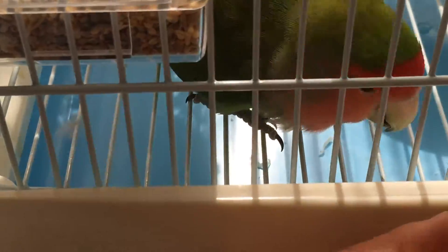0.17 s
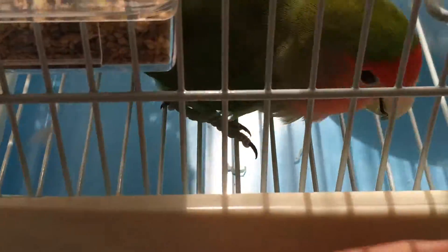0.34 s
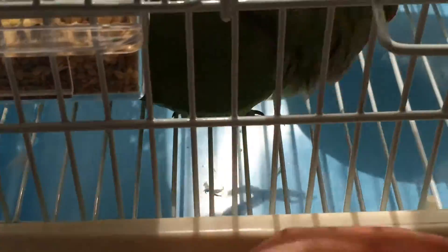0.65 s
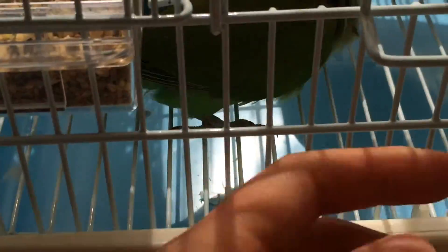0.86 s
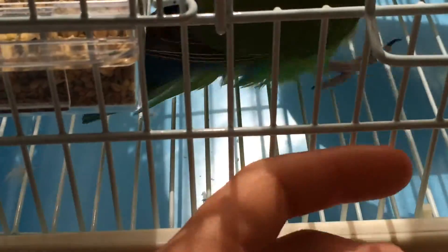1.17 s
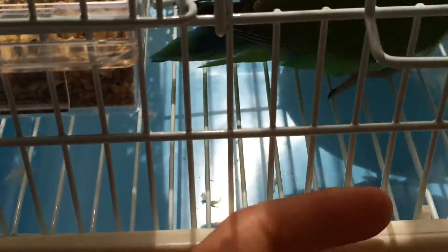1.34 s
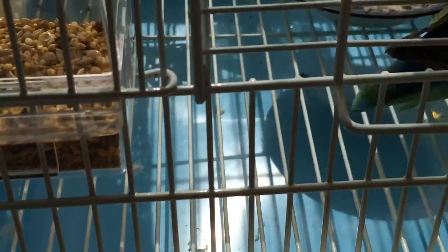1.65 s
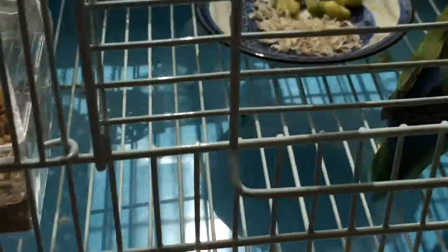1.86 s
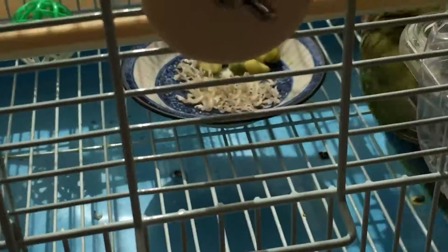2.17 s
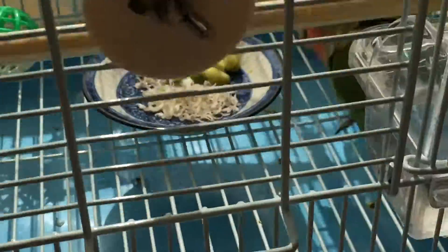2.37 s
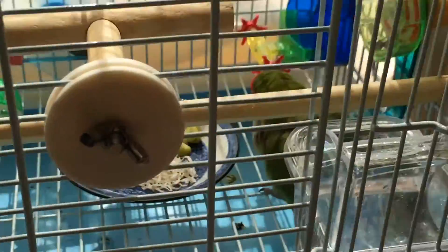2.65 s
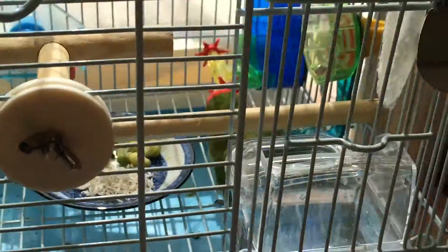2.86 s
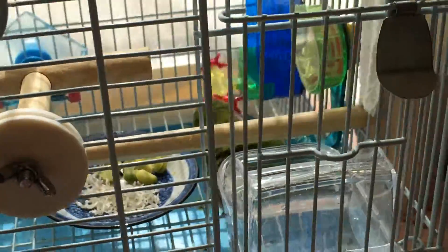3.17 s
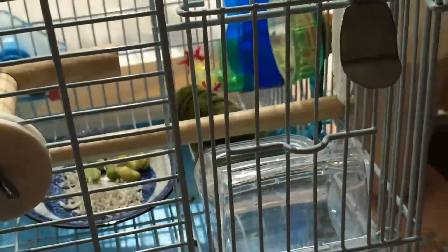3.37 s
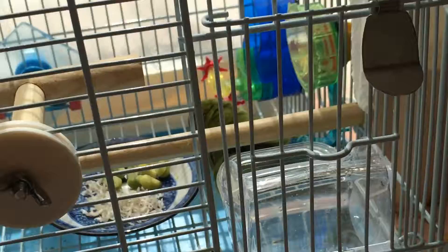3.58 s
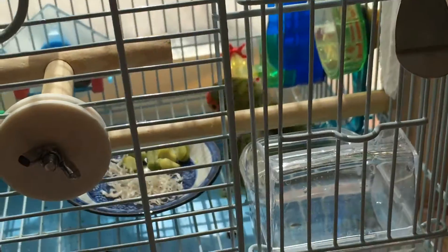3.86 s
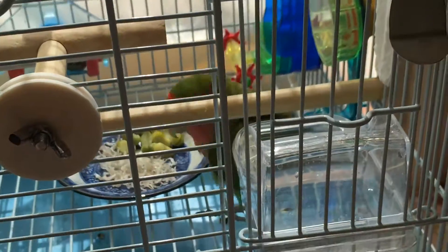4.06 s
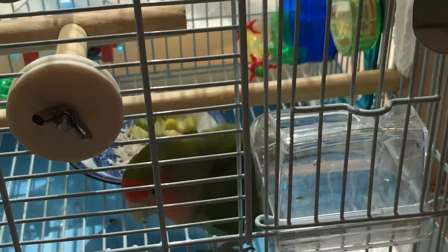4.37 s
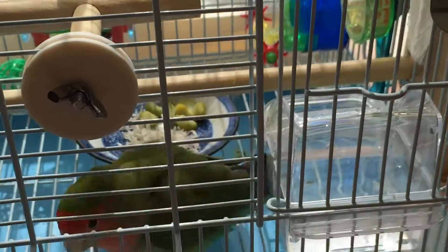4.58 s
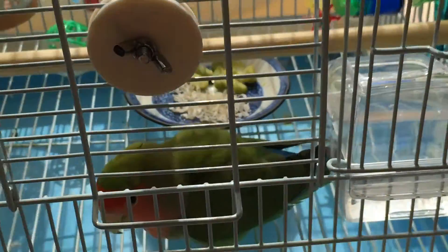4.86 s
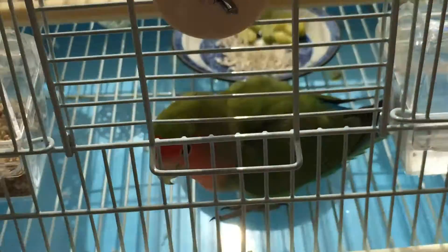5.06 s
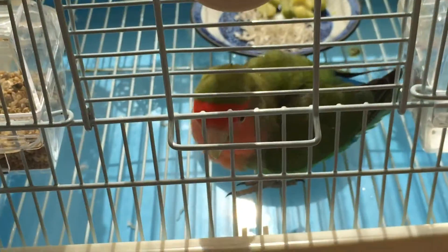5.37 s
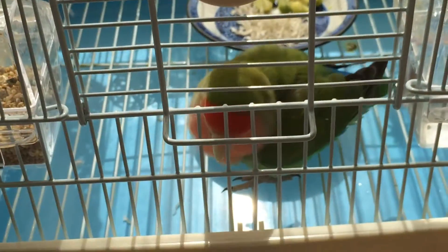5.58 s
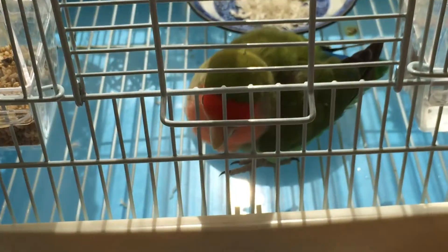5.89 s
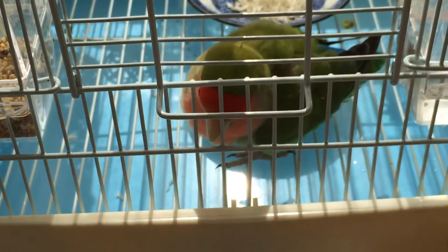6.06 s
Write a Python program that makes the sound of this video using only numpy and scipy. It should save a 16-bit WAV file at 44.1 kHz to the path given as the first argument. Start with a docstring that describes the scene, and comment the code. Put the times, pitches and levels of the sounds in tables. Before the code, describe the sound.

Claws tick on wire, cage bars clatter loudly, and a small bird gives one high chirp before knocking a loose toy about.

```python
"""A quiet room, close to a cage: a small parrot walks the wire floor, claws scuffing and ticking.
It jolts the cage once: loose bars chatter through the cage resonances and the frame rocks.
It chirps once, four partials on an arched pitch, then rattles and bangs a loose hard toy,
which rings in short modes. Under it all: faint rustle, hush, a low hum, a little echo."""
import sys
import numpy as np
from scipy import signal
from scipy.fft import rfft, irfft
from scipy.io import wavfile
from scipy.ndimage import uniform_filter1d

SR = 44100
rng = np.random.default_rng(int(sys.argv[2]) if len(sys.argv) > 2 else 0)


def master_out(mix):
    """Clip the mix to full scale and print it as 16-bit PCM to the path in sys.argv[1]."""
    frames = np.transpose(np.atleast_2d(mix))
    ceiling = np.clip(frames, -1, 1)
    pcm = np.round(ceiling * 32767).astype(np.int16)
    wavfile.write(sys.argv[1], SR, pcm)


N = 274743

# Room and microphone noise. Each row: frequency in Hz, density in dB.
HUSH_SPECTRUM = [(12, -53.5), (20, -19), (101, -2), (208, -10), (275, -8), (308, -18), (396, -14.5),
                 (430, -15.5), (495, -15.5), (636, -20.5), (692, -18), (1470, -23.5), (1600, -24.5),
                 (1890, -27.5), (15700, -53)]
# Low hum. Each row: time in seconds, level in dB.
HUM_LEVELS = [(0, -70), (1, -51.5), (1.6, -72), (2.2, -56), (3.8, -55.5), (4.3, -70.5), (6.23, -69)]
# Room decay. Each row: frequency in Hz, t60 in seconds.
ROOM_T60 = [(250, 1), (1000, 1), (4000, 0.26), (7500, 0.26), (11000, 0.25), (15000, 0.15)]
# The bird stirring, and the cage's noise at the jolt. Each row: time in seconds, level in dB.
RUSTLE_LEVELS = [(0.0, -54.5), (0.31, -90.5), (0.64, -70.5), (1.21, -52.5), (1.361, -38), (1.54, -71),
                 (1.719, -75), (2.15, -65), (3.539, -56), (3.66, -67.5), (3.97, -59), (4.27, -62.5),
                 (4.94, -68.5), (6.23, -83.5)]
# Rustle colour. Each row: frequency in Hz, density in dB.
RUSTLE_SPECTRUM = [(500, 1), (1300, -1), (2500, -9.5), (5000, -12.5), (10000, -19.5), (15800, -24)]
# Ticks of claw or husk. Each row: start in seconds, level in dB, tilt in dB per octave.
DRY_TICKS = [(0.879, -63, -10), (1.5898, -45, 3), (2.2548, -52, 5.5), (2.5077, -47, 3.5),
             (2.5825, -43.5, 9), (2.817, -50, -2), (2.997, -41.5, -8), (4.0974, -59, -8), (4.9534, -53, -7),
             (5.0264, -37, -6), (5.228, -57, 2), (5.935, -49.5, -1.5)]
# Tick colour. Each row: frequency in Hz, density in dB.
TICK_SPECTRUM = [(300, -22), (900, -7), (2000, -4.5), (6000, 3.5), (15000, -11)]
# Claws, and loose wires rebounding from the jolt, strike the wire floor.
# Each row: start in seconds, level in dB, tilt in dB per octave.
FLOOR_STRIKES = [(0.026, -42.5, 3), (0.651, -50, 28), (0.8014, -48.5, -7), (1.0005, -56.5, 4.5),
                 (1.0814, -54, 1.5), (1.112, -46, -8), (1.1772, -6.5, -5), (1.2044, -20.5, -2),
                 (1.2254, -17.5, 0.5), (1.2514, -20.5, -3.5), (1.2744, -15.5, -5.5), (1.3167, -16.5, -7),
                 (1.3344, -29, -4), (1.4649, -31, -1.5), (1.5724, -32, 15.5), (1.6062, -41, 6.5),
                 (1.6415, -41, 15), (1.6952, -32.5, 6), (1.847, -56.5, -2.6), (2.0397, -49.5, -0.4),
                 (2.1175, -43.5, 0.5), (2.8694, -41, -7.5), (3.471, -52, -3.5), (3.917, -37.5, -5),
                 (4.114, -39, -1), (4.2214, -63, 3), (4.3118, -50.5, 0), (4.3806, -54.5, 5),
                 (4.408, -51.5, 0.6), (4.554, -63, 0), (4.617, -54, -0.7), (4.687, -36.5, 1),
                 (4.727, -48, -7), (5.808, -55.5, -10.5)]
# Scuff colour. Each row: frequency in Hz, density in dB.
SCUFF_SPECTRUM = [(880, -34.5), (1500, -7), (3890, -4), (4980, -6), (5770, 1), (7600, 3.5), (8390, -2),
                  (9820, 0), (14800, -6.5), (15700, -14.5)]
# Floor wire resonances. Each row: frequency in Hz, width in Hz before widening, gain in dB.
WIRE_MODES = [(2530, 26, -13.5), (4000, 67, -6), (4440, 59, -10), (7510, 66, -2.5), (9840, 69, 1.5),
              (12376, 34, -9.5), (11300, 190, -9.5), (13100, 44, -18.5), (15000, 40, -9.5),
              (15400, 22, -14)]
# Single bars ringing out. Each row: start in seconds, frequency in Hz, level in dB.
BAR_RINGS = [(.965, 1495, -48), (1.095, 3390, -54), (1.13, 3390, -52), (1.295, 11550, -27),
             (1.315, 9700, -30), (1.39, 11550, -37), (1.43, 11550, -43), (1.49, 11550, -41),
             (1.57, 11550, -38), (1.575, 9500, -41), (1.6, 1495, -41), (1.608, 9700, -34),
             (1.62, 2740, -50), (1.645, 9700, -40), (1.7, 1495, -40), (1.705, 4130, -43), (1.72, 7450, -47),
             (1.9, 1495, -46), (2.07, 1240, -55.5), (2.87, 9700, -52), (4.73, 9700, -54)]
# Bar decay. Each row: frequency in Hz, t60 in seconds.
BAR_DECAY = [(1400, .22), (2800, 0.43), (3400, 0.13), (4100, 0.19), (8000, .08), (11600, 0.13)]
# Flicked bar. Each row: frequency in Hz, gain in dB, t60 in seconds.
PING_MODES = [(2200, -14, .012), (4240, -13, .03), (6627, 0, .045), (6750, -6, .03), (9523, -4, .035),
              (9604, -6, .045), (11690, -13, .035), (13200, -15, .04), (14500, -16, .015)]
# Cage resonances. Each row: frequency in Hz, width in Hz, gain in dB.
CAGE_MODES = [(488, 38, -7), (694, 23, -8), (776, 20, -8.5), (844, 17, -2), (963, 13, -9), (1107, 27, -2),
              (1163, 16, -5), (1240, 41, -3.5), (1313, 17, -3), (1345, 25, -5.5), (1455, 28, -3.5),
              (1520, 27, 0.5), (1695, 35, -7), (1805, 39, -4.5), (1996, 22, -6.5), (2024, 14, -7.5),
              (2475, 28, -9.5), (2812, 27, -11.5), (3250, 50, -10.5), (3800, 90, -9), (4450, 56, -11),
              (4840, 50, -12.5), (5600, 59, -12), (7170, 50, -13), (7650, 70, -17.5), (8290, 50, -13),
              (9330, 60, -13), (9900, 60, -15), (11550, 50, -10), (12900, 100, -20)]
# Broad colour of the rattle. Each row: frequency in Hz, density in dB.
CAGE_SPECTRUM = [(76, -37), (130, -9), (290, -11.5), (470, -15), (635, -2), (688, -6.5), (1500, 0),
                 (1660, -12.5), (1840, -11), (2590, -5), (10100, -17), (15700, -33)]
# Cage touched, jolted, nudged. Each row: start in seconds, level in dB, rise and t60 in seconds.
CAGE_JOLTS = [(1.164, -29.5, 0.0016, 0.17), (1.174, -13, 0.0054, 0.61), (1.3, -33.5, .08, 1.6),
              (1.58, -38.5, 0.023, 0.72), (1.86, -53, 0.039, 3.9)]
# Frame rocking on its base. Each row: start in seconds, level in dB.
FRAME_SWINGS = [(1.174, -26.5), (1.255, -32.5)]
# Toy resonances. Each row: frequency in Hz, gain in dB, t60 in seconds.
TOY_MODES = [(1629, -2, 0.035), (1727, -1, 0.022), (1977, 0.5, 0.016), (2625, -8, 0.02), (3617, 3, 0.03),
             (3970, 1, 0.018), (4540, -3, 0.011), (5210, -10, 0.014), (5900, -9, 0.016),
             (7200, -10.5, .012), (7510, -3, .02), (9200, -5, .012), (9900, -5, .012)]
# Toy clack. Each row: frequency in Hz, density in dB.
CLACK_SPECTRUM = [(130, -57.5), (300, -5), (600, -8.5), (1000, -39.5), (1600, 1.5), (2400, -1), (3600, 5.5),
                  (5800, -2), (7300, 0), (8600, -8.5), (9600, 2), (12000, -13.5), (15700, -16.5)]
# Toy knocks. Each row: start in seconds, level in dB, low-mode and top-mode gains in dB.
TOY_KNOCKS = [(2.8542, -29.5, -15.5, -7), (2.9118, -42.5, 7, 7), (2.9293, -26, -1, -2),
              (3.0407, -38, 2.2, 0.7), (3.0493, -32.5, 14.5, -8.5), (3.0791, -22, -4.5, -16),
              (3.0928, -36, 10.5, -28), (3.1055, -36.5, 7, -22), (3.1222, -29, 8.5, -7.5),
              (3.1821, -31, -8, -8.5), (3.1959, -38, 13, -11), (3.2086, -33.5, 9, -7.5),
              (3.2455, -31.5, 11.5, -11), (3.2979, -31, 9, -17), (3.3343, -35, -5, -10),
              (3.351, -38, 18, -13.5), (3.3727, -34, 5.5, -7), (3.4141, -37.5, -6.5, -9.5),
              (3.8452, -39, 13.5, 0), (3.8543, -35.5, -15, -12)]
# Chirp contour. Each row: time in seconds, pitch in Hz, effort in dB.
CHIRP_CONTOUR = [(2.297, 3350, -48), (2.301, 3560, -24), (2.306, 3800, -19), (2.312, 3920, -16),
                 (2.34, 3895, -15), (2.356, 3740, -16), (2.367, 3430, -14), (2.37, 3330, -23),
                 (2.374, 3230, -50)]
# Chirp colour, with dips from the room's echo. Each row: frequency in Hz, gain in dB.
CHIRP_COLOUR = [(3300, -12), (3470, -12), (3585, -28), (3720, -8), (3900, 0.6), (6700, -8), (7180, 3),
                (7500, -4), (7800, -12), (10000, -14), (10380, -9), (10800, -25), (11700, -17),
                (13800, -35), (14800, -20), (15500, -60)]

PING_START_S, SHAKE_START_S, BANG_START_S = 0.905, CAGE_JOLTS[0][0], 3.5275


def amp(db):
    """Decibels to gain."""
    return 10 ** (np.asarray(db) / 20)


def unit_rms(x):
    """Scales to rms 1."""
    return x / np.sqrt(np.mean(x ** 2) + 1e-20)


def at_peak(x, db):
    """Sets twice the rms of the loudest 2 ms to db."""
    return x * amp(db) / np.sqrt(4 * uniform_filter1d(x ** 2, size=88).max())


def lookup(table, hz):
    """Interpolates on a log-frequency axis."""
    table_hz, values = np.transpose(table)
    return np.interp(np.log(hz + 1), np.log(table_hz + 1), values)


def level_curve(table):
    """Gain per sample from rows of time and dB."""
    times_s, db = np.transpose(table)
    return amp(np.interp(np.arange(N) / SR, times_s, db))


def add(mix, start_s, sound):
    """Mixes a sound in at start_s."""
    part = mix[round(start_s * SR):][:len(sound)]
    part += sound[:len(part)]


def coloured(x, spectrum, tilt_db_oct=0):
    """Filters by a spectrum table, tilted about 7 kHz."""
    hz = np.fft.rfftfreq(len(x), 1 / SR)
    gain_db = lookup(spectrum, hz) + tilt_db_oct * np.log2((hz + 50) / 7000)
    return irfft(rfft(x) * amp(gain_db), len(x))


def lowpass(x, hz):
    """Zero-phase low-pass."""
    return signal.sosfiltfilt(signal.butter(2, hz, fs=SR, output="sos"), x)


def shelf(x, treble_db, split_hz):
    """Applies a gain above split_hz."""
    low = lowpass(x, split_hz)
    return low + amp(treble_db) * (x - low)


def resonate(x, hz, width_hz):
    """One resonance, gain about 1; at 0 Hz, a low-pass."""
    radius = np.exp(-np.pi * width_hz / SR)
    pole = radius * np.exp(2j * np.pi * hz / SR)
    return 2 * signal.lfilter([1 - radius], [1, -pole], x).real


def ring(force, modes):
    """A force drives decaying sine modes."""
    t = np.arange(len(force) // 2) / SR
    response = sum(amp(db - 60 * t / t60_s) * np.sin(2 * np.pi * hz * t) for hz, db, t60_s in modes)
    return signal.fftconvolve(force, response)[:len(force)]


def lumpy_noise(samples, lump_samples, depth_db):
    """Noise that comes in random bunches."""
    lumps = unit_rms(uniform_filter1d(rng.standard_normal(samples), size=lump_samples))
    return rng.standard_normal(samples) * amp(depth_db * lumps)


def contact(t60_s, rise_s, grit_db, samples, after_db, after_t60_s=0.12):
    """Rough contact force: uneven clicks rise, decay and leave a faint after-rattle."""
    t = np.arange(samples) / SR
    clicks = rng.standard_normal(samples) * amp(grit_db * rng.standard_normal(samples))
    decay = amp(-60 * t / t60_s) + amp(after_db - 60 * t / after_t60_s)
    return clicks * (1 - np.exp(-t / rise_s)) * decay


def blow(t, db, rise_s, t60_s):
    """Envelope of a blow at t = 0: rise, then exponential decay."""
    t = np.maximum(t, 0)
    return (1 - np.exp(-(t / rise_s) ** 2)) * amp(db - 60 * t / t60_s)


def dulling(t, bright_db, dull_db, tau_s):
    """Treble gain in dB, sinking after a blow."""
    return dull_db + (bright_db - dull_db) * np.exp(-t / tau_s)


def hush(db=-53.5):
    """Steady noise whose bass rumble swells and sinks."""
    noise = unit_rms(coloured(rng.standard_normal(N), HUSH_SPECTRUM))
    rumble = lowpass(noise, hz=300)
    drift = uniform_filter1d(rng.standard_normal(N), size=3000)
    swell_db = 3.1 * unit_rms(uniform_filter1d(drift, size=3000))
    return amp(db) * (noise - rumble + amp(swell_db) * rumble)


def hum(hz=67.4, stage_width_hz=20):
    """Narrow low noise that comes and goes."""
    band = resonate(rng.standard_normal(N), hz, stage_width_hz)
    return level_curve(HUM_LEVELS) * unit_rms(resonate(band, hz, stage_width_hz))


def room_echo(x, db=-17):
    """Sparse reflections of random sign; each band dies at its own rate."""
    taps = np.zeros(SR)
    slots = np.arange(200, SR - 20, 20)
    taps[slots + rng.integers(0, 20, len(slots))] = rng.choice([-1., 1.], len(slots))
    hz, t, bands = signal.stft(taps, SR, nperseg=256)
    decay = amp(-60 * t / lookup(ROOM_T60, hz)[:, None])
    tail = signal.istft(bands * decay, SR, nperseg=256)[1]
    return amp(db) * signal.fftconvolve(x, tail / np.linalg.norm(tail))[:N]


def rustle():
    """Faint rustle of the bird stirring, swelling with the cage's noise at the jolt."""
    noise = lumpy_noise(N, lump_samples=500, depth_db=2.2)
    return level_curve(RUSTLE_LEVELS) * unit_rms(coloured(noise, RUSTLE_SPECTRUM))


def dry_tick(db, tilt_db_oct):
    """A brief contact with no ring."""
    force = contact(t60_s=0.005, rise_s=0.0002, grit_db=1.4, samples=4096, after_db=-43.5)
    return at_peak(coloured(force, TICK_SPECTRUM, tilt_db_oct), db)


def floor_strike(db, tilt_db_oct, widening=2.8):
    """A claw or rebounding wire strikes the floor; its wires ring unevenly, less on dull strikes."""
    force = contact(t60_s=0.095, rise_s=0.0024, grit_db=5.4, samples=8192, after_db=-38)
    shares_db = 5 * rng.standard_normal(len(WIRE_MODES))
    spot_colour = np.transpose([np.linspace(1000, 16000, 16), 4 * rng.standard_normal(16)])
    wires = sum(amp(mode_db + share_db) * resonate(force, hz, widening * width_hz)
                for (hz, width_hz, mode_db), share_db in zip(WIRE_MODES, shares_db))
    scuff = coloured(coloured(force, SCUFF_SPECTRUM, tilt_db_oct), spot_colour)
    wires_db = -4 + min(tilt_db_oct, 0)
    return at_peak(unit_rms(scuff) + amp(wires_db) * unit_rms(wires), db)


def bar_ring(hz, db):
    """One bar rings on a close pair of modes, roughened by a lingering touch."""
    t60_s = lookup(BAR_DECAY, hz)
    force = contact(t60_s / 3, rise_s=0.002, grit_db=1.5, samples=16384, after_db=-14, after_t60_s=t60_s)
    pair = [(hz, 0, t60_s), (hz * 1.007, -7, t60_s)]
    return at_peak(ring(force, pair), db)


def bar_ping(db=-20):
    """A claw flicks one bar: a tick, its modes, a short rattle."""
    force = contact(t60_s=0.005, rise_s=0.001, grit_db=1.5, samples=8192, after_db=-24, after_t60_s=0.09)
    scuff = unit_rms(coloured(force, SCUFF_SPECTRUM, tilt_db_oct=-1.7))
    return at_peak(unit_rms(ring(force, PING_MODES)) + amp(-5) * scuff, db)


def cage_rattle(samples):
    """Loose bars meet in bunches and chatter through the cage resonances."""
    chatter = lumpy_noise(samples, lump_samples=150, depth_db=2.5)
    bars = sum(amp(db) * resonate(chatter, hz, width_hz) for hz, width_hz, db in CAGE_MODES)
    body = coloured(chatter, CAGE_SPECTRUM)
    return unit_rms(unit_rms(body) + unit_rms(bars))


def cage_shake(sway_hz=91):
    """The jolted cage rattles, losing treble, while the frame sways on its base."""
    t = np.arange(SR * 5 // 4) / SR
    scene_s = t + SHAKE_START_S
    rattle_gain = sum(blow(scene_s - start_s, *row) for start_s, *row in CAGE_JOLTS)
    sway_gain = sum(blow(scene_s - start_s, db, rise_s=0.027, t60_s=0.48) for start_s, db in FRAME_SWINGS)
    sway = resonate(rng.standard_normal(len(t)), sway_hz, width_hz=23)
    sway = unit_rms(resonate(sway, sway_hz, width_hz=37))
    treble_db = dulling(t, bright_db=0.5, dull_db=-18.5, tau_s=0.75)
    rattle = shelf(cage_rattle(len(t)), treble_db, split_hz=1900)
    return rattle_gain * rattle + sway_gain * sway


def toy_body(force, clack_db):
    """The hard toy rings in short modes, detuned at each touch, over a broad clack."""
    detunes = 1 + 0.012 * rng.standard_normal(len(TOY_MODES))
    modes = [(hz * detune, db, t60_s) for (hz, db, t60_s), detune in zip(TOY_MODES, detunes)]
    ringing = coloured(ring(force, modes), [(200, -30), (1300, 0)])  # the rings carry little below about 1 kHz
    return unit_rms(ringing) + amp(clack_db) * unit_rms(coloured(force, CLACK_SPECTRUM))


def toy_knock(db, low_db, top_db):
    """A light touch with a tick at first contact; where it lands weights low and top modes."""
    spot_colour = [(900, low_db - 15), (1400, low_db), (2000, low_db),
                   (2600, 0), (4800, 0), (6000, top_db)]
    force = contact(t60_s=0.012, rise_s=0.0021, grit_db=3, samples=6144, after_db=-22)
    knock = at_peak(coloured(toy_body(force, clack_db=-13.5), spot_colour), db)
    add(knock, 0, dry_tick(db + top_db - 8.5, tilt_db_oct=0.14))
    return knock


def toy_bang():
    """A hard blow sets the toy chattering, treble dying first, and the cage rattling dully."""
    t = np.arange(SR // 2) / SR
    hit_gain = blow(t, db=-12, rise_s=0.0033, t60_s=0.038)
    chatter_gain = blow(t, db=-16.5, rise_s=0.0033, t60_s=0.25)
    cage_gain = blow(t, db=-29, rise_s=0.024, t60_s=0.48)
    force = lumpy_noise(len(t), lump_samples=60, depth_db=1.7)
    treble_db = dulling(t, bright_db=6.5, dull_db=-17, tau_s=0.056)
    toy = shelf(unit_rms(toy_body(force, clack_db=1.5)), treble_db, split_hz=4960)
    cage = shelf(cage_rattle(len(t)), treble_db=-12, split_hz=3000)
    return (hit_gain + chatter_gain) * toy + cage_gain * cage


def parrot_chirp(rasp_ratio=0.88, rasp_stage_width_hz=1100, rasp_re_tremor_db=-10):
    """Four partials glide through the chirp colour, each with a tremor and a rasp just below."""
    times_s, pitches_hz, efforts_db = np.transpose(CHIRP_CONTOUR)
    t = np.arange(times_s[0], times_s[-1], 1 / SR)
    hz = np.interp(t, times_s, pitches_hz)
    effort_db = np.interp(t, times_s, efforts_db)
    phase = 2 * np.pi * np.cumsum(hz) / SR
    voice = 0
    for k in range(1, 5):
        noise = rng.standard_normal((2, len(t)))
        tremor, jitter = unit_rms(signal.oaconvolve(noise, np.hanning(110)[None], "same"))
        roughness = 0.055 * k ** 1.3
        tone = (1 + roughness * tremor) * np.sin(k * phase + roughness * jitter)
        slow_noise = resonate(resonate(noise[0], 0, rasp_stage_width_hz), 0, rasp_stage_width_hz)
        rasp = unit_rms(slow_noise) * np.sin(k * phase * rasp_ratio)
        gain = np.sqrt(2) * amp(effort_db + lookup(CHIRP_COLOUR, k * hz))
        voice += gain * (tone + roughness * amp(rasp_re_tremor_db) * rasp)
    return voice * signal.windows.tukey(len(t), 0.06)


def scene():
    """Bird, cage and toy with their room echo, over hush and hum; mono."""
    direct = rustle()
    for events, source in ((FLOOR_STRIKES, floor_strike), (DRY_TICKS, dry_tick),
                           (TOY_KNOCKS, toy_knock), (BAR_RINGS, bar_ring)):
        for start_s, *row in events:
            add(direct, start_s, source(*row))
    add(direct, PING_START_S, bar_ping())
    add(direct, BANG_START_S, toy_bang())
    add(direct, SHAKE_START_S, cage_shake())
    add(direct, CHIRP_CONTOUR[0][0], parrot_chirp())
    return (direct + room_echo(direct) + hush() + hum())[None]


def record(dry):
    """Hard limit at full scale, then a 15.8 kHz low-pass."""
    band_limit = signal.firwin(511, 15800, window=("kaiser", 9), fs=SR)
    return signal.oaconvolve(np.clip(dry, -1, 1), band_limit[None], "same")


dry = scene()
out = record(dry)
master_out(out)
```